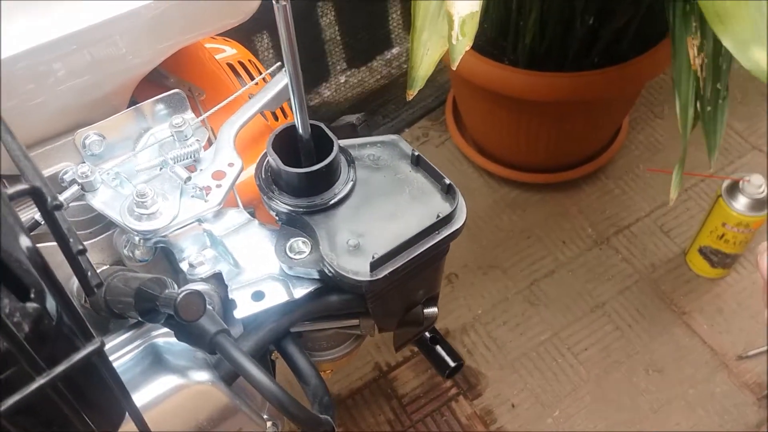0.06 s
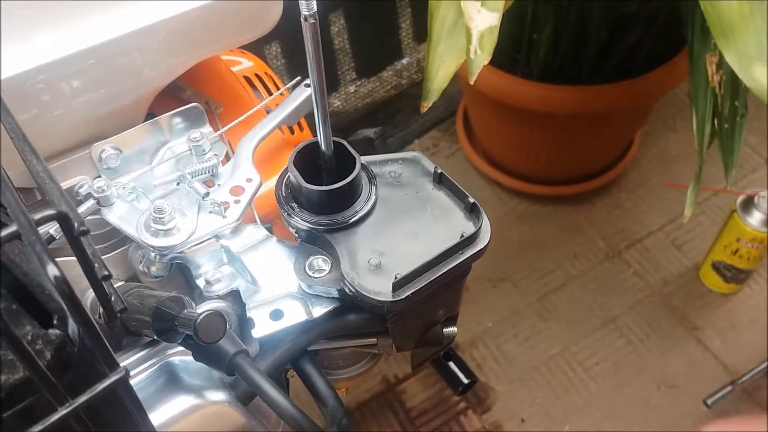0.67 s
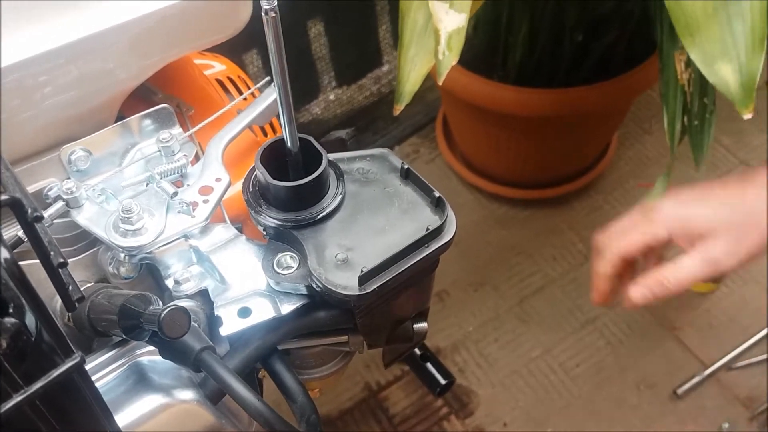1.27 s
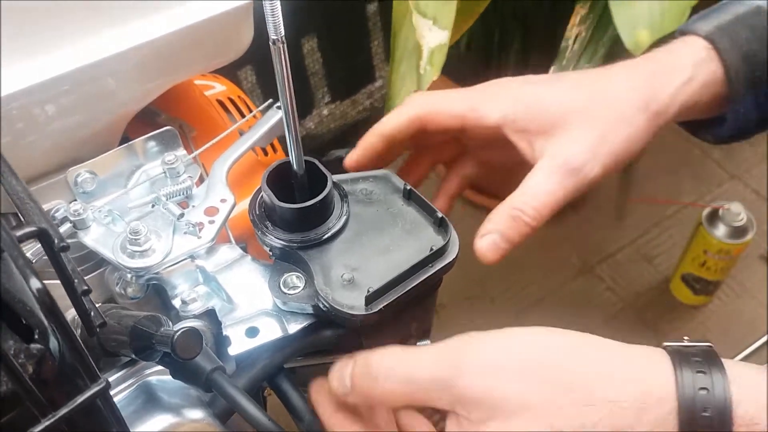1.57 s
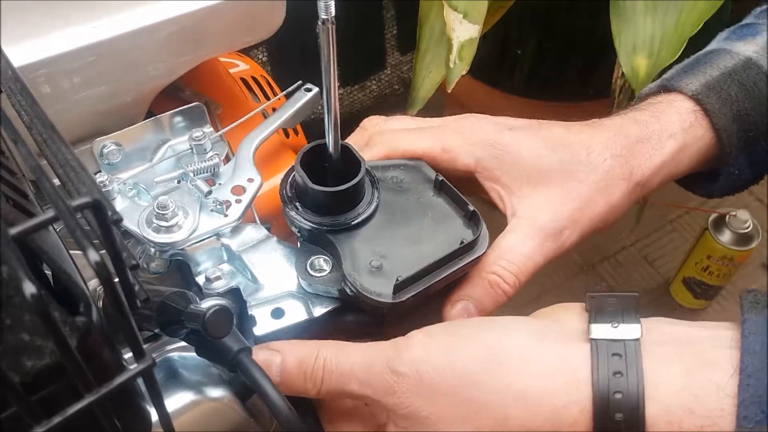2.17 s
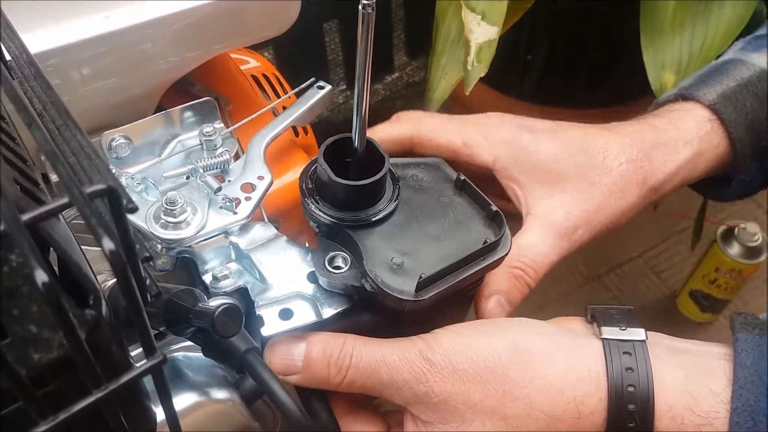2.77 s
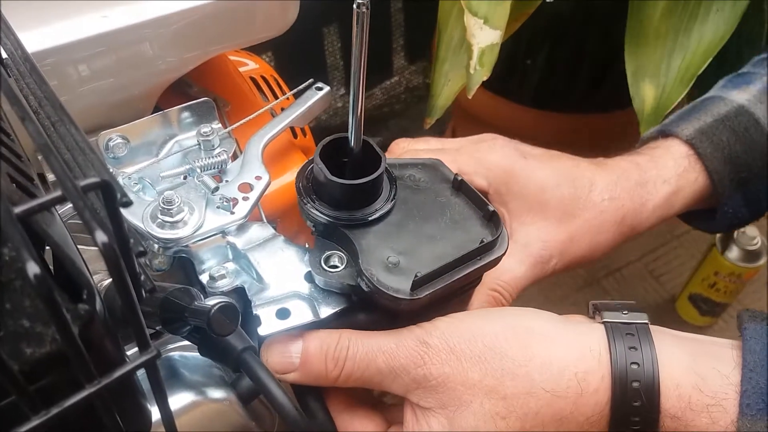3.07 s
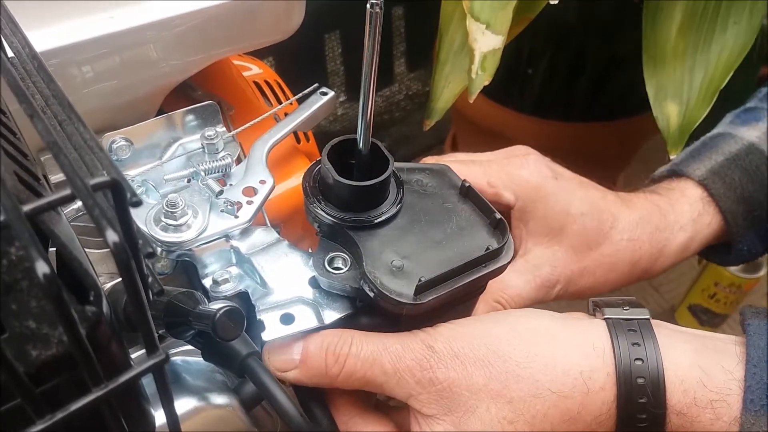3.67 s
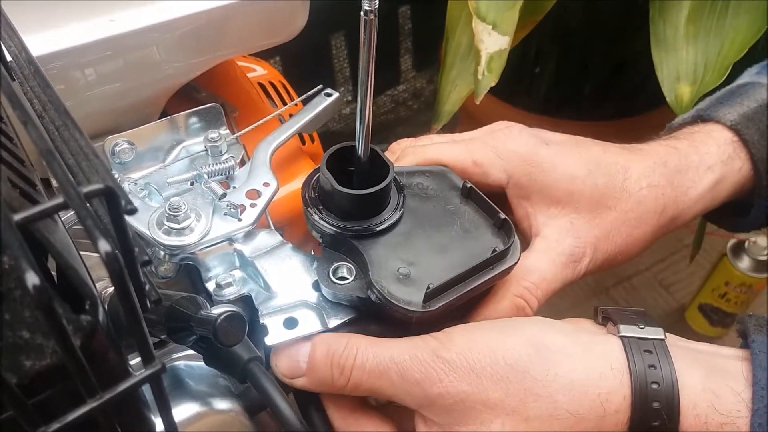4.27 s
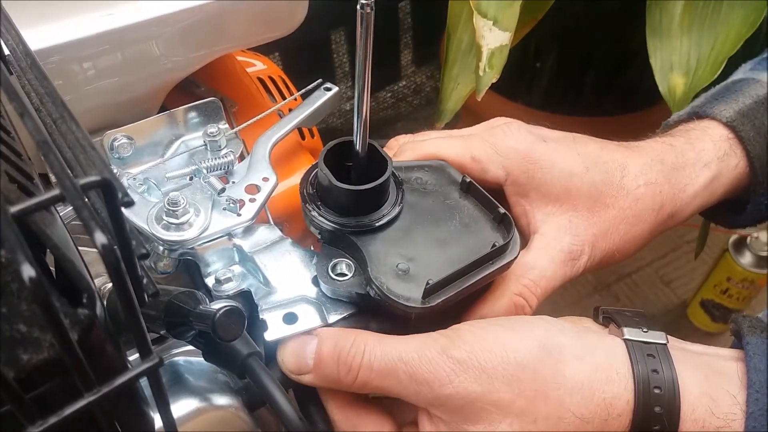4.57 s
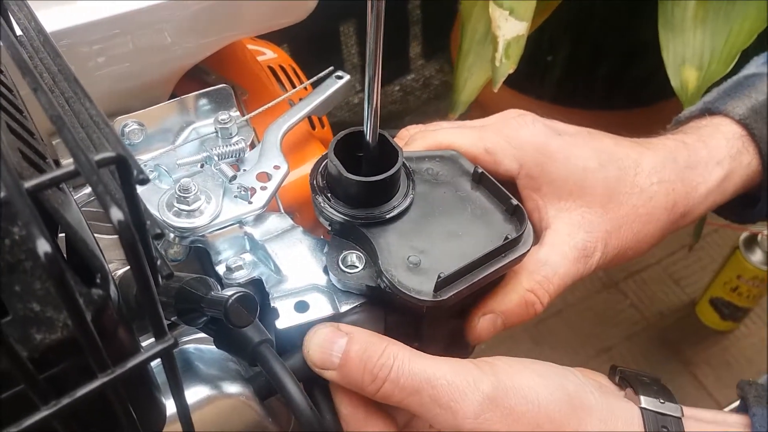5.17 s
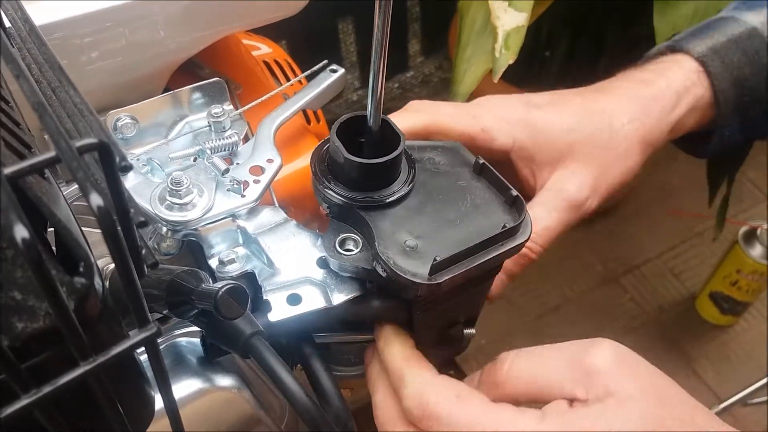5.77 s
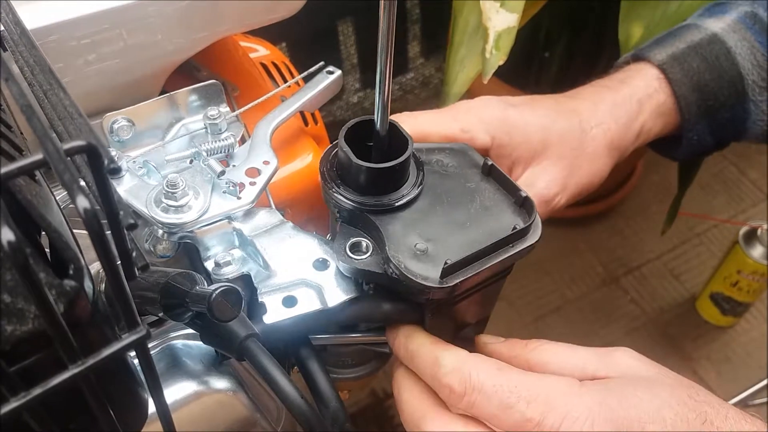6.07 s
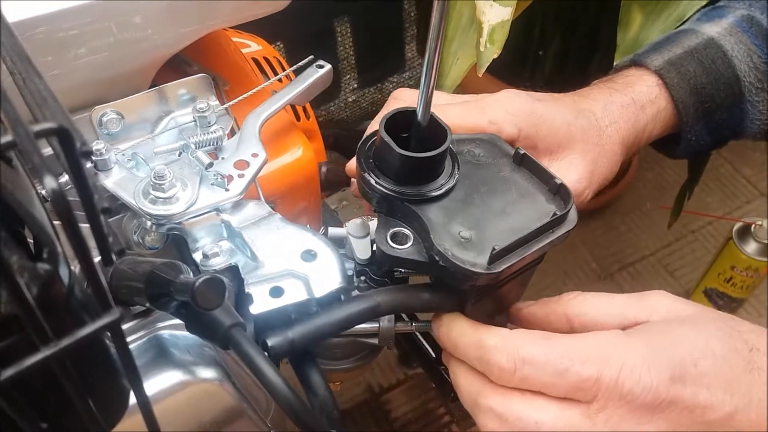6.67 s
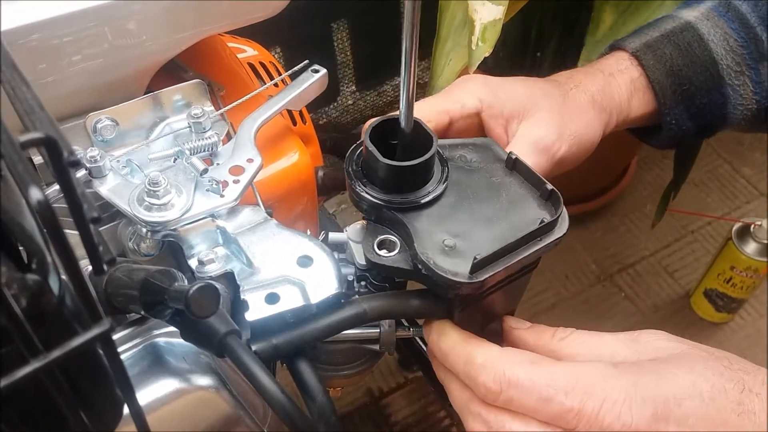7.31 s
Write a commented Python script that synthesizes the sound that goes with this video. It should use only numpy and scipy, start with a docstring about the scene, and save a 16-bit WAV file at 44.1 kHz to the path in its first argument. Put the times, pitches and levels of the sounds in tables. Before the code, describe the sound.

On a balcony, with faint far birds and a low outdoor rumble behind, a steel wrench clatters briefly on tiles, followed by a loud thump and cloth rustle on the microphone. Close by, hands tug at a small engine's plastic housing, which creaks, snaps and knocks hollowly at uneven intervals. From about halfway there is a faint hum, and the sharpest jolts make a steel socket ring lightly.

```python
"""Work on a small engine on a tiled balcony. Far birds call over dull outdoor noise, and light bumps jar
the microphone. A steel socket wrench is put down, its modes ringing as it bounces on the tiles; a hard
bump follows, with a rustle of cloth. Two hands then rock the plastic air filter housing loose: it creaks
by stick-slip friction and knocks hollowly against its seat. Halfway a faint hum sets in, and from then on
the sharpest jolts ring a steel socket standing in the housing."""
import sys
import numpy as np
from scipy import signal
from scipy.fft import rfft, irfft
from scipy.io import wavfile

SR = 44100
rng = np.random.default_rng(int(sys.argv[2]) if len(sys.argv) > 2 else 0)


def log_audio(samples):
    """Write samples as a 16-bit WAV file to the path given in sys.argv[1]."""
    # one column per channel
    frames = np.atleast_2d(samples).T
    # limit to full scale, then quantise
    limited = np.clip(frames, -1, 1)
    pcm = np.round(limited * 32767).astype(np.int16)
    wavfile.write(sys.argv[1], SR, pcm)


N = 328104
TIME = np.arange(N) / SR
HIT_TIME = np.arange(SR // 2) / SR

# Spectrum of low rumble. Each row: frequency in Hz, relative level in dB.
RUMBLE_SPECTRUM = [(25, -37), (42, -6), (60, 8), (82, 10), (130, 6), (200, -2.5), (350, -47.5)]
# Spectrum of the housing's dense modes. Each row: frequency in Hz, relative level in dB.
PLASTIC_SPECTRUM = [(100, 2), (340, 6), (520, -4), (1100, 5.5), (1700, 1.5), (2500, -2), (4000, -13.5),
                    (5500, -22), (7500, -47), (15500, -1.5)]


def from_db(db):
    return 10 ** (np.asarray(db) / 20)


def rms_one(x):
    return x / np.sqrt(np.mean(x ** 2) + 1e-20)


def add(out, s, sound):
    """Superposition: mix a sound in at s seconds."""
    start = round(s * SR)
    out[start:start + len(sound)] += sound[:N - start]


def cut(x, hz, kind, order=2):
    return signal.sosfilt(signal.butter(order, hz, kind, fs=SR, output="sos"), x)


def split(x, hz):
    """A crossover: the bands below and above hz are in phase and sum flat."""
    return cut(cut(x, hz, "low"), hz, "low"), cut(cut(x, hz, "high"), hz, "high")


def noise(spectrum, size=len(HIT_TIME)):
    """White noise shaped to a spectrum, at rms 1."""
    hz, db = np.transpose(spectrum)
    gain = from_db(np.interp(np.log(np.fft.rfftfreq(size, 1 / SR) + 1), np.log(hz), db))
    return rms_one(irfft(rfft(rng.standard_normal(size)) * gain, size))


def drift(per_s):
    """Slow random modulation with a spread of about 1."""
    knots = np.arange(0, N / SR + 1, 1 / per_s)
    return np.interp(TIME, knots, rng.standard_normal(len(knots)))


def swell(s, length_s):
    """A Gaussian envelope centred on s seconds."""
    return np.exp(-(2 * (TIME - s) / length_s) ** 2)


def fade(t60):
    """Exponential damping: 60 dB lost in t60 seconds."""
    return np.exp(-np.log(1000) * HIT_TIME / t60)


def ring(modes):
    """Free vibration: a sum of damped modes whose strength and sign vary from blow to blow."""
    out = np.zeros(len(HIT_TIME))
    for hz, db, t60 in modes:
        amplitude = from_db(db + rng.uniform(-3.75, 1.25)) * rng.choice([-1, 1])
        out += amplitude * np.sin(2 * np.pi * hz * HIT_TIME) * fade(t60)
    return out


def contact(length_s, grains_per_s, grain_db):
    """Contact force: an impulse, then tiny random slips that build and die."""
    slips = (rng.random(len(HIT_TIME)) < grains_per_s / SR) * rng.standard_normal(len(HIT_TIME))
    age = HIT_TIME / length_s
    force = from_db(grain_db) * slips * np.sqrt(age) * np.exp(-age ** 2)
    force[0] = 1
    return force


def run_of_contacts(s, count, period_s, db, step_db, hardness_db, body_db, edge_db, body_loss):
    """Evenly spaced contacts; a harder one is briefer and trades body (bass) for edge (treble)."""
    grinding_share, softening_db = 0.41, 1
    for k in range(count):
        hard_db = hardness_db - softening_db * k
        length_s = grinding_share * period_s * from_db(-0.46 * max(hard_db, 0))
        balance_db = np.array([body_db - body_loss * hard_db, 0, edge_db + hard_db])
        yield s + k * period_s, length_s, db + k * step_db + balance_db


def blow(force, response, levels_db, top_hz):
    """Convolution of force and impulse response, with set levels of body, middle and edge."""
    sound = signal.fftconvolve(force, response)[:len(HIT_TIME)]
    reach_hz = np.clip(top_hz * from_db(0.4 * (levels_db[2] + 44)), 2500, 7000)   # rises with the edge
    body, rest = split(cut(sound, reach_hz, "low"), 550)
    middle, edge = split(rest, 1700)
    attack = HIT_TIME < .03
    bands = zip(levels_db, (body, middle, edge))
    return sum(from_db(db) * band / np.std(band[attack]) for db, band in bands)


def outdoors():
    """Amplitude-modulated noise: a lumpy rumble under a dull, wavering wash."""
    # Each row: time in seconds, relative levels of rumble and wash in dB.
    levels = [(0.0, -55.5, -61), (0.43, -61, -61), (0.83, -53.5, -55), (0.97, -53.5, -52.5),
              (1.82, -57, -54.5), (3.36, -58, -58.5), (3.98, -52.5, -54), (4.81, -57.5, -55.5),
              (6.05, -55.5, -55), (6.4, -54.5, -54), (7.44, -58, -57)]
    # Each row: frequency in Hz, relative level in dB.
    wash_spectrum = [(80, -19.5), (200, -0.5), (420, -1.5), (560, -5), (1100, -9), (2000, -15),
                     (3000, -21.5), (4500, -29.5), (7000, -44), (12000, -51)]
    s, rumble_db, wash_db = np.transpose(levels)
    rumble = from_db(2.13 + np.interp(TIME, s, rumble_db) + 1.7 * drift(11)) * noise(RUMBLE_SPECTRUM, N)
    wash = from_db(-1 + np.interp(TIME, s, wash_db) + 1.8 * drift(25)) * noise(wash_spectrum, N)
    return rumble + wash


def hiss():
    """The microphone's self-noise is steady and broadband."""
    # Each row: frequency in Hz, relative level in dB.
    spectrum = [(1000, -5), (7000, -13.5), (10000, -10), (13000, -5), (15500, -3)]
    return from_db(-72.5) * noise(spectrum, N)


def birds():
    """Distance smears each call into a band of noise; short chirps stay narrow."""
    # Each row: centre time and length in seconds, pitch in Hz, relative level in dB.
    calls = [(0.167, 0.26, 3420, -68), (0.554, 0.32, 3220, -67.5), (2.432, 0.24, 3620, -66.5),
             (2.678, 0.032, 3030, -62), (2.9, 0.053, 3100, -60.5), (4.103, 0.11, 3460, -65),
             (5.58, 0.19, 3570, -66.5), (6.524, 0.17, 3430, -64)]
    out = np.zeros(N)
    for s, length_s, hz, db in calls:
        width = 1.01 + 0.67 * length_s
        band = rms_one(cut(rng.standard_normal(N), [hz / width, hz * width], "band"))
        out += from_db(db - 6.5) * band * swell(s, length_s)
    return out


def bumps():
    """Structure-borne sound: each bump crosses the microphone's case as a click and a damped thump."""
    # Each row: start in seconds, thump and click gains in dB, click cutoff in Hz.
    impacts = [(0.3504, -28.5, -26.5, 1400), (0.355, -28, -24.5, 940), (1.3914, -4.5, -8.5, 2900),
               (1.4692, -26, -30, 1980), (1.811, -26.5, -35, 4140), (1.8331, -29.5, -19, 3900),
               (4.4644, -29, -36, 2150)]
    # The hardest bump grazes just before it lands; the case rattles twice before and twice after.
    s, thump_db, click_db, click_hz = max(impacts, key=lambda bump: bump[1])
    rattle = [(s + k * .0133, thump_db - 17, click_db - 15.5, click_hz) for k in (-2, -1, 1, 2)]
    graze = [(s - 0.001, -np.inf, click_db - 7, click_hz)]
    start_hz, end_hz, sag_s = 210, 66.7, 0.0023
    hz = end_hz + (start_hz - end_hz) * np.exp(-HIT_TIME / sag_s)
    thump = cut(np.cos(2 * np.pi * np.cumsum(hz) / SR) * fade(0.025), 1030, "low")
    impulse = signal.unit_impulse(len(HIT_TIME))
    out = np.zeros(N)
    for s, thump_db, click_db, click_hz in impacts + rattle + graze:
        click = cut(cut(impulse, click_hz, "low", order=4), 5900, "low", order=6)
        fizz = from_db(0.7 * click_db) * cut(impulse, 14000, "high")   # only hard bumps reach the top
        add(out, s, -from_db(click_db) * (click / np.max(click) + fizz))
        add(out, s + 0.00033, from_db(thump_db) * thump)   # the case yields just after the contact
    return cut(out, 70, "high", order=4)


def wrench():
    """Impact excitation: the steel shaft rings in its modes at each bounce on the tiles."""
    # Each row: start in seconds, touches, period in seconds, then level, step and hardness in dB.
    landings = [(0.828, 1, 0.021, -41.5, 0, -9.5), (0.8637, 1, 0.012, -34.5, 0, -4.5),
                (0.903, 3, .023, -41.5, -6, 1), (1.005, 1, 0.021, -42, 0, -0.5),
                (1.102, 1, 0.017, -56, 0, 12.5), (1.132, 1, 0.024, -43.5, 0, 0.5),
                (1.296, 4, .022, -45.5, 1.3, 0)]
    # Each row: frequency in Hz, level in dB, T60 in seconds.
    shaft_modes = [(127.3, 0, 0.29), (303, -5, 0.14), (402, -4.5, 0.078), (712, 7.5, 0.091),
                   (794, -2, 0.16), (935, 5.5, 0.08), (1690, 13, 0.043), (1950, 7.5, 0.047),
                   (2230, -8, 0.044), (2590, 8.5, 0.046), (2663, -6, 0.15), (3120, -10, 0.12),
                   (3090, -5, 0.21), (4710, -19, 0.14)]
    # The dense modes. Each row: frequency in Hz, relative level in dB.
    steel_spectrum = [(40, -33), (150, 5), (280, 4), (560, -7), (1250, -7.5), (2000, -1.5), (3500, -10.5),
                      (5200, -17.5), (7500, -27), (15500, -20)]
    envelope = from_db(10.5) * fade(0.035) + from_db(-2.5) * fade(0.43)   # a crack, then the walls' tail
    out = np.zeros(N)
    for landing in landings:
        for s, length_s, levels_db in run_of_contacts(*landing, body_db=1, edge_db=-9, body_loss=.45):
            dense = noise(steel_spectrum) * envelope
            force = contact(length_s, grains_per_s=1500, grain_db=-6)
            add(out, s, blow(force, ring(shaft_modes) + dense, levels_db, top_hz=5570))
    return out


def pings():
    """Hard contact excites high modes: the wrench's tip pings on the tile."""
    # Each row: start in seconds, gain in dB.
    touches = [(.866, -57), (0.9036, -48), (1.009, -45.5), (1.132, -57)]
    # Each row: frequency in Hz, level in dB, T60 in seconds.
    tip_modes = [(4470, 2.5, 0.054), (6500, -13, 0.05), (9210, -8, 0.05), (9889, -7.5, 0.11),
                 (12300, -8, 0.065), (14420, -2, .06), (15230, -6, .056)]
    build_up = 1 - fade(0.021)
    out = np.zeros(N)
    for s, db in touches:
        sparkle = cut(rng.standard_normal(len(HIT_TIME)), 8800, "high") * fade(0.039)
        add(out, s, from_db(db) * build_up * (ring(tip_modes) + from_db(1) * sparkle))
    return out


def cloth():
    """Friction noise: cloth brushes the microphone around the bumps."""
    # Each row: centre time and length in seconds, level in dB.
    rustles = [(1.363, 0.026, -35.5), (1.405, 0.039, -35), (1.4724, 0.011, -41), (1.811, 0.059, -48)]
    # Each row: frequency in Hz, relative level in dB.
    spectrum = [(100, 10), (250, 12), (700, 3.5), (2000, -1), (3500, -13.5), (5200, -19), (7000, -41),
                (15000, -26)]
    return noise(spectrum, N) * sum(from_db(db) * swell(s, length_s) for s, length_s, db in rustles)


def housing():
    """Stick-slip friction on its studs drives the plastic box; a tight grip damps it to a dry snap."""
    # Each row: start in seconds, slips, period in seconds, then level, step, hardness and ring in dB.
    tugs = [(2.217, 1, 0.18, -66, -5.5, -43.5, 18), (2.517, 2, .025, -38, -9.5, -16.5, -3),
            (2.736, 2, 0.021, -55, -2, -6, -6), (3.0761, 1, .026, -48, 0, 4, -5),
            (3.882, 3, 0.021, -47.5, 2.5, -2, 1), (4.101, 3, 0.04, -54.5, 0.2, -8.5, -7.5),
            (5.48, 2, .022, -59.5, 10, -8, -10.5), (5.695, 1, 0.016, -58, 0, -7, -2),
            (6.014, 1, 0.026, -43, 0, 7, -6), (6.245, 1, .025, -56, 0, -7, -7),
            (6.294, 2, 0.02, -53, 5.5, 9, -0.5), (6.551, 4, 0.027, -47.5, -1, 0, -2.5),
            (6.776, 1, 0.03, -53, 0, -5.5, -4)]
    # Each row: frequency in Hz, level in dB, T60 in seconds.
    box_modes = [(337, 0.5, 0.068), (387.1, 2.5, 0.3), (664, -10.5, 0.24), (885, -3, 0.086),
                 (1007, -2, 0.34), (1075, -0.5, 0.14), (1128, 2.5, 0.07), (1554, 2, 0.06),
                 (1810, -21, 0.082), (2213, 5, 0.04), (2524, -12, 0.13), (3100, -20, 0.21)]
    envelope = from_db(12) * fade(0.013) + from_db(-8) * fade(0.56)
    out = np.zeros(N)
    for *tug, ring_db in tugs:
        for s, length_s, levels_db in run_of_contacts(*tug, body_db=-2.7, edge_db=-7.5, body_loss=.43):
            dense = noise(PLASTIC_SPECTRUM) * envelope
            force = contact(length_s, grains_per_s=2200, grain_db=0)
            vibration = from_db(ring_db) * ring(box_modes) + dense
            response = cut(vibration, 237, "high")   # a small box radiates little bass
            add(out, s, blow(force, response, levels_db, top_hz=4520))
    return out


def pulls():
    """Handling noise: low rumble swells with each pull on the housing."""
    # Each row: centre time and length in seconds, gain in dB.
    efforts = [(2.735, .12, -48.5), (2.99, .09, -50.5), (3.712, 0.54, -49), (4.042, 0.16, -45),
               (4.407, 0.091, -48)]
    envelope = sum(from_db(db) * swell(s, length_s) for s, length_s, db in efforts)
    return envelope * cut(noise(RUMBLE_SPECTRUM, N), 650, "low")


def tocks():
    """Cavity resonance: the hollow housing rings as it tips against its seat."""
    # Each row: start in seconds, relative levels of the knock and of its edge in dB.
    knocks = [(3.101, -28, -6), (4.045, -28, -8), (4.663, -43, -25), (5.302, -27.5, -17), (7.036, -44, -13),
              (7.268, -40, -9)]
    # Each row: frequency in Hz, level in dB, T60 in seconds.
    cavity_modes = [(376, -2.5, 0.13), (659, 2.5, 0.058), (1220, -18, 0.066), (1760, -22, 0.027)]
    out = np.zeros(N)
    for s, db, edge_db in knocks:
        edge = cut(noise(PLASTIC_SPECTRUM), 3000, "low") * (fade(0.021) + from_db(-15) * fade(0.37))
        add(out, s, from_db(db - 5.5) * (ring(cavity_modes) + from_db(edge_db + 4.5) * edge))
    return out


def shoves():
    """Damped vibration: a shove on the engine dies away as dull noise."""
    # Each row: start in seconds, gain in dB, T60 in seconds.
    thuds = [(3.35, -37.5, 0.087), (3.362, -44, 0.57)]
    # Each row: frequency in Hz, relative level in dB.
    spectrum = [(60, -9), (140, -2), (220, 1), (520, -9), (700, -16), (1500, -48.5)]
    out = np.zeros(N)
    for s, db, t60 in thuds:
        add(out, s, cut(from_db(db) * noise(spectrum) * fade(t60), 820, "low"))
    return out


def hum():
    """A far hum fades in halfway; frequency modulation makes its partials waver together."""
    # Each row: frequency in Hz, mean rms level in dB.
    partials = [(58.5, -62), (172.3, -59), (231, -64.5), (344.5, -66.5), (458, -67)]
    wavering_time = TIME + np.cumsum(0.00367 * drift(4)) / SR
    tone = sum(from_db(db + 0.83 * drift(4.1)) * np.sqrt(2) * np.sin(2 * np.pi * hz * wavering_time)
               for hz, db in partials)
    return tone * np.interp(TIME, [3.7, 4.4], [0, 1])


def socket():
    """Sympathetic vibration: sharp jolts ring the lightly damped steel socket in the housing."""
    # Each row: start in seconds, gain in dB.
    jolts = [(3.877, -49), (3.93, -45.5), (6.021, -45), (6.557, -55)]
    # Each row: frequency in Hz, level in dB, T60 in seconds.
    modes = [(1785, 3.5, 0.09), (2160, -13, 0.72), (2460, -1, 0.28), (2565, -1, 0.2), (2880, -42, 0.47)]
    out = np.zeros(N)
    for s, db in jolts:
        add(out, s, from_db(db) * ring(modes) * (1 - fade(.03)))
    return out


def scene():
    """All sources superpose in one channel."""
    work = wrench() + pings() + housing() + socket() + tocks()
    handling = bumps() + cloth() + shoves() + pulls()
    background = birds() + outdoors() + hum() + hiss()
    return (work + handling + background)[None]


def record(dry):
    """Band limiting: the small microphone drops the deepest bass, and the top is cut steeply."""
    low_pass = signal.ellip(12, .1, 80, 16000, fs=SR, output="sos")
    return signal.sosfilt(low_pass, cut(dry, 38, "high"))


dry = scene()
out = record(dry)
log_audio(out)
```